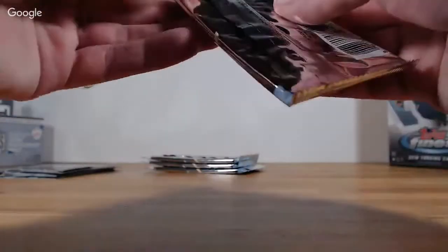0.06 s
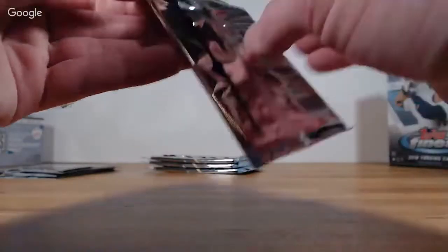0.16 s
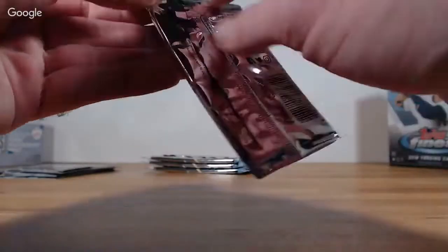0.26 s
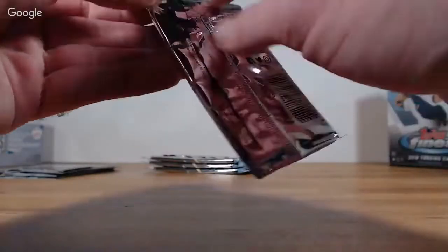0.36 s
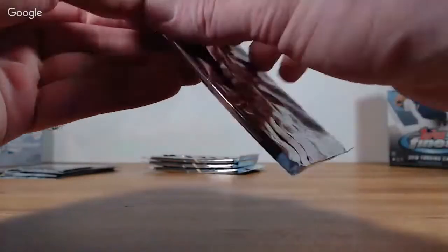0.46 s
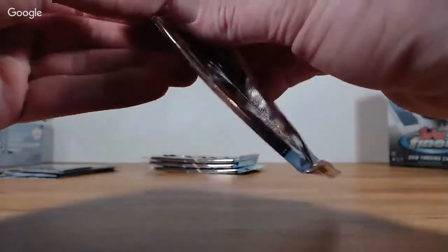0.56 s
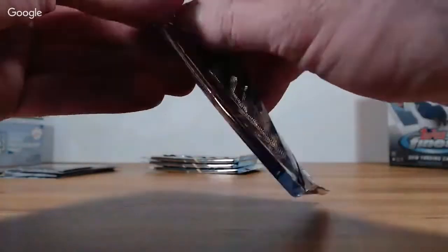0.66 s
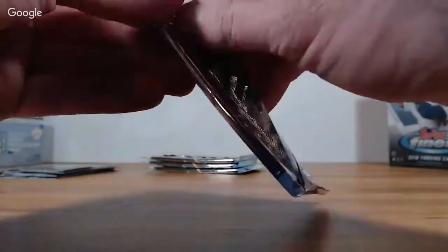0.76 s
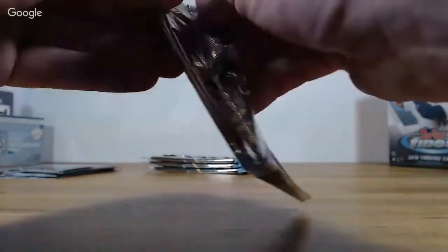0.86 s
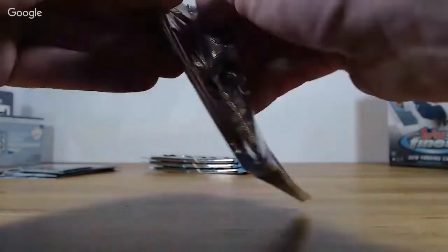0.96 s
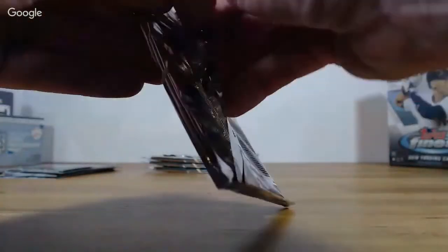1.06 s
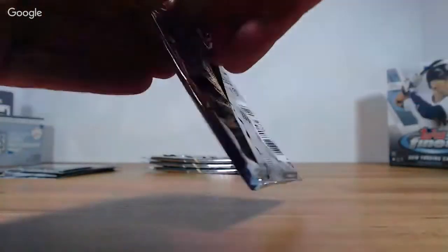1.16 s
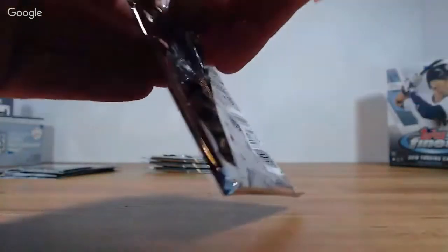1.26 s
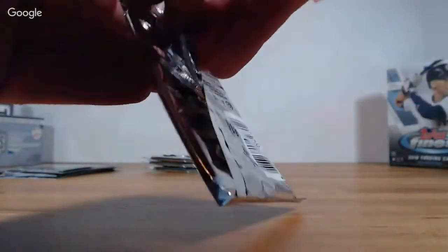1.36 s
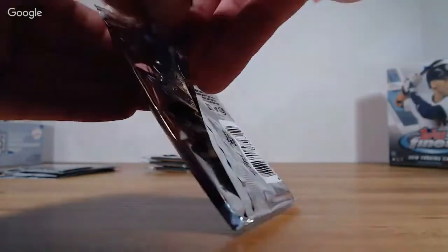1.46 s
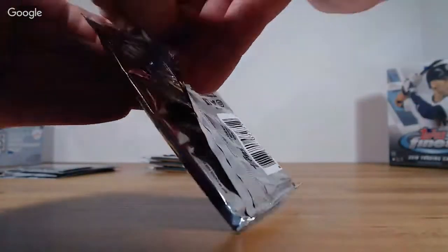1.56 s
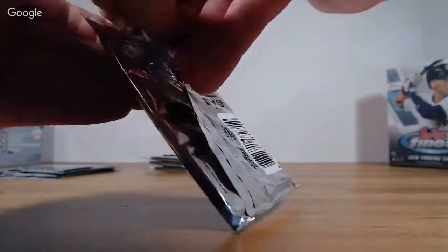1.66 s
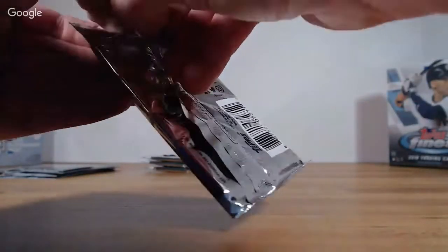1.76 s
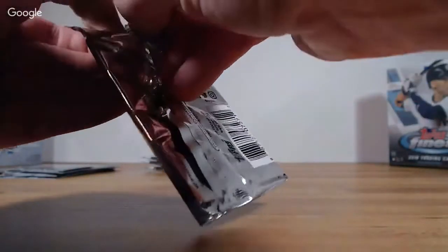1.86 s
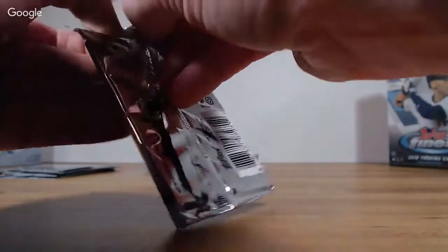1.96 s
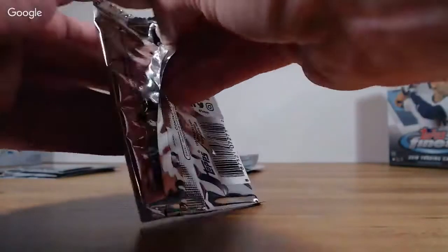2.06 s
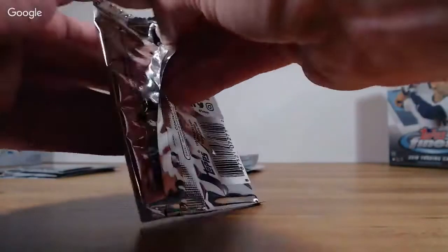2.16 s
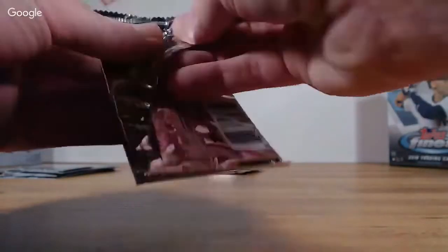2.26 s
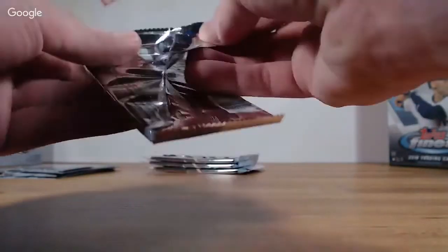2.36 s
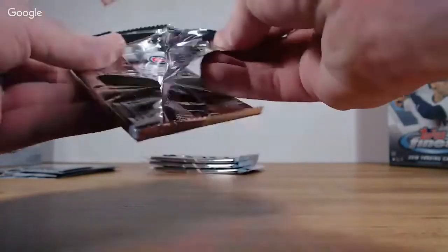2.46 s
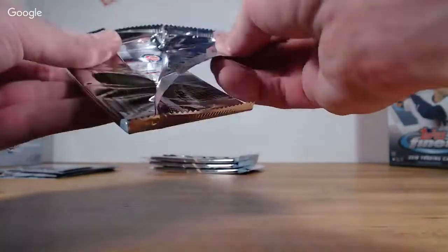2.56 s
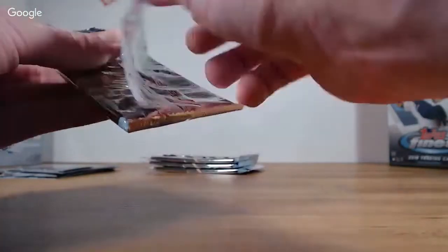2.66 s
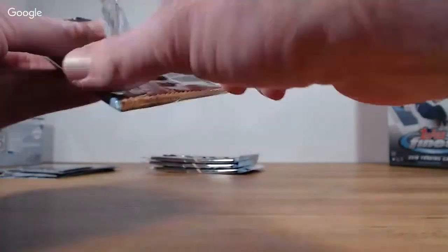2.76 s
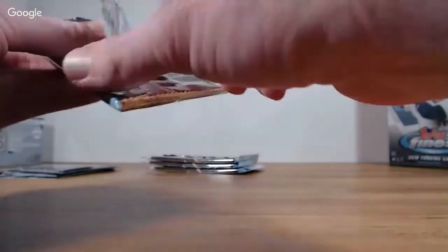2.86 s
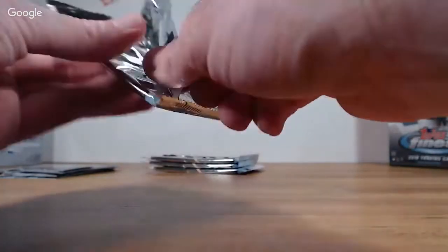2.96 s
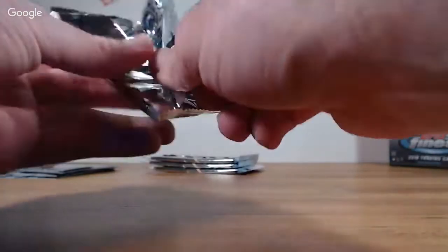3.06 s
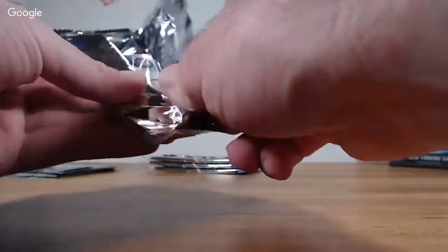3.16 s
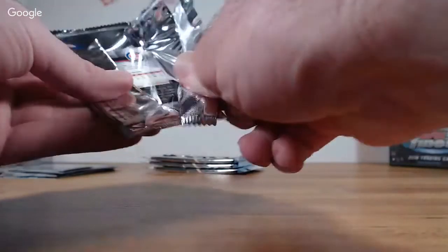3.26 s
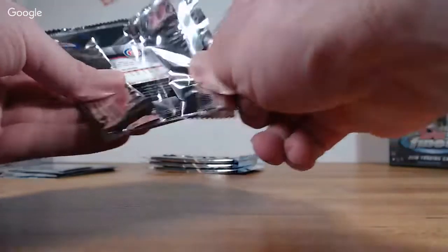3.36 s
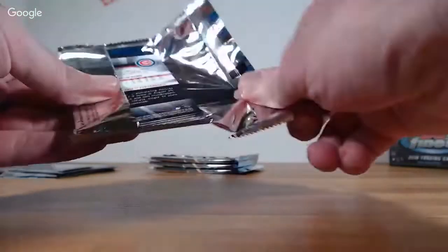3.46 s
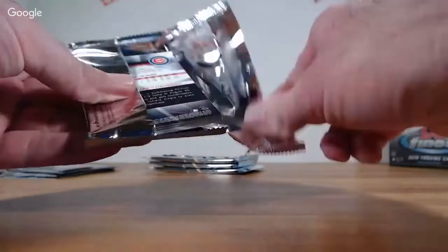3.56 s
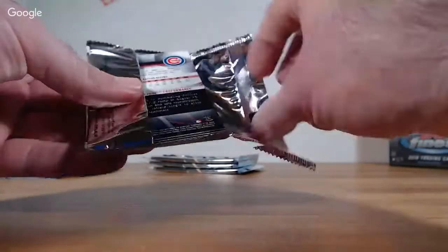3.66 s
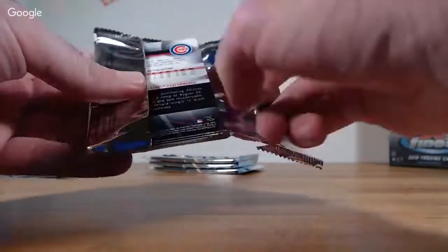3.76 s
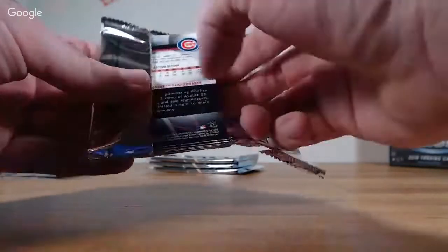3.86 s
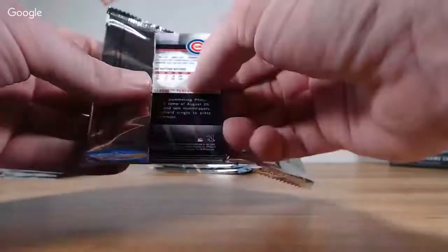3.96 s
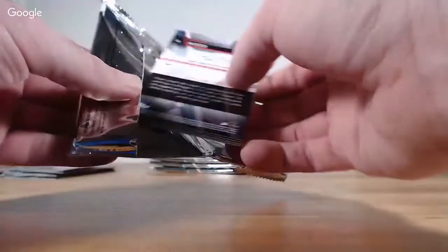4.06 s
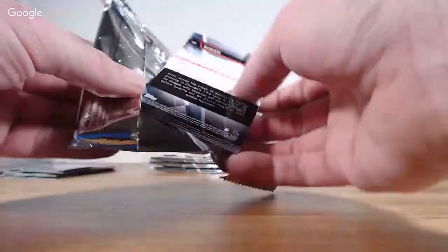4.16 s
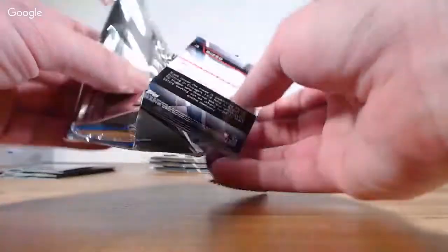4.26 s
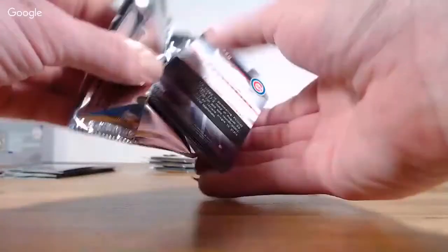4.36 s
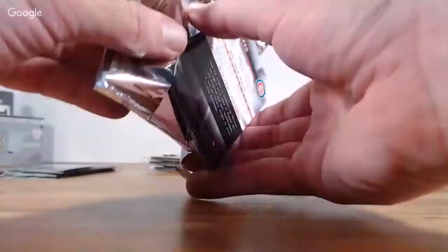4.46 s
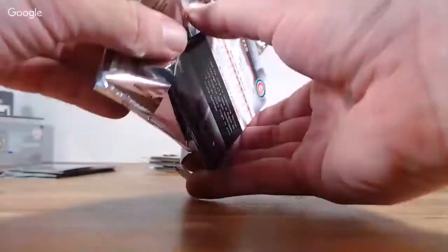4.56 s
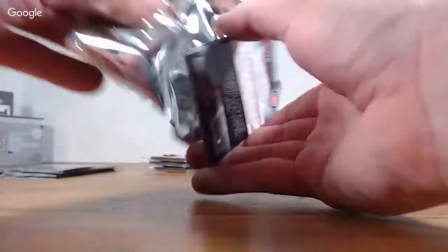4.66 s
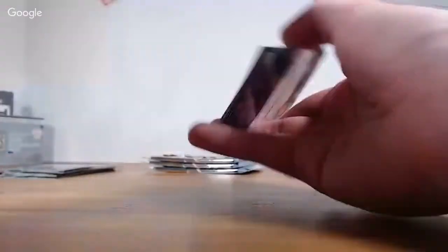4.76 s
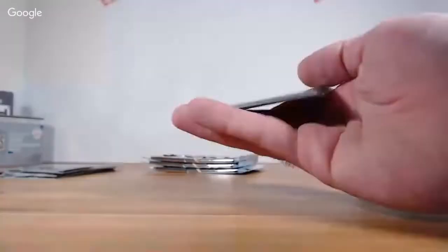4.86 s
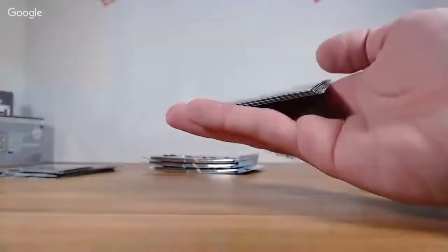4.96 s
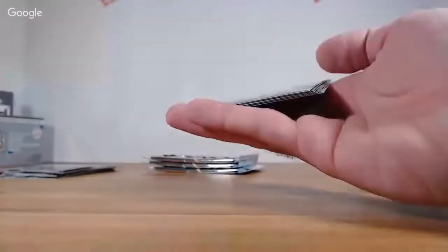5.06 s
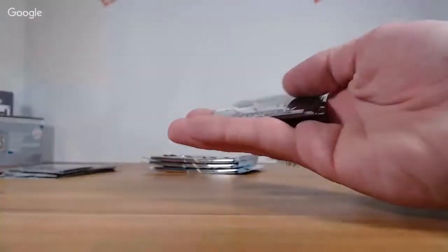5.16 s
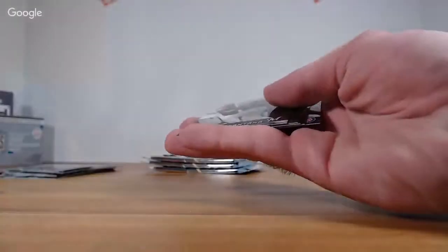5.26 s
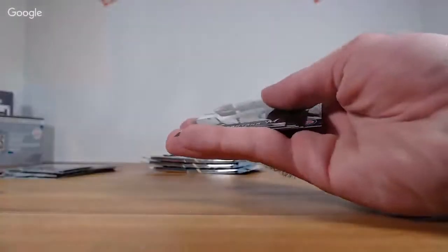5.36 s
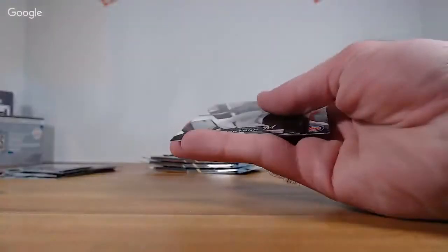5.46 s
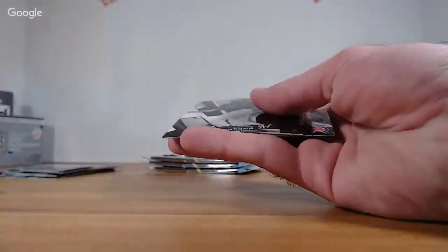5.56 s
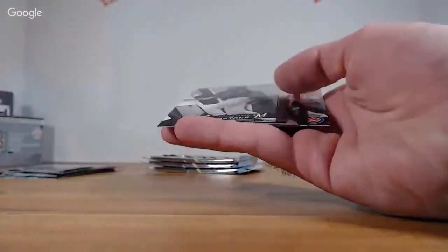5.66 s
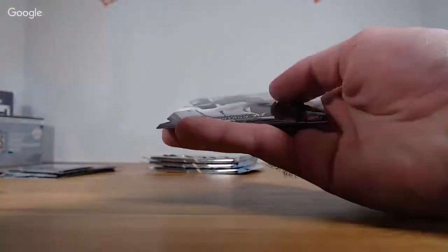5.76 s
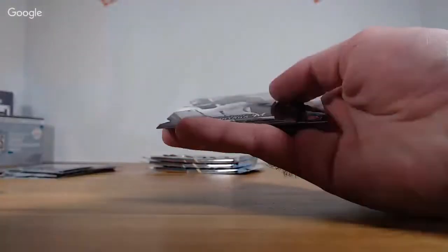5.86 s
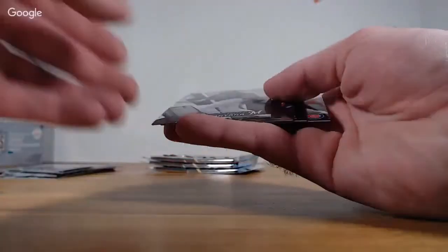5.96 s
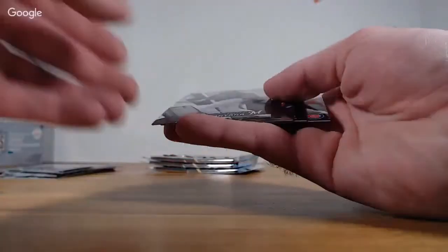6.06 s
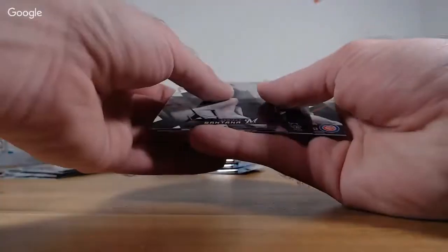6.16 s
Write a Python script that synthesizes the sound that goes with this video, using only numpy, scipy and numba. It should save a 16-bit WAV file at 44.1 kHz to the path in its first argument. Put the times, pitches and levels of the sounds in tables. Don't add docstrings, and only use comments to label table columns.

```python
import sys
import numpy as np
from scipy import signal
from scipy.fft import rfft, irfft, next_fast_len
from scipy.io import wavfile
from scipy.ndimage import uniform_filter1d
from numba import njit

SR = 44100
rng = np.random.default_rng(int(sys.argv[2]) if len(sys.argv) > 2 else 0)


def voltage_ratio(decibels):
    exponent = np.asarray(decibels, float) / 20
    return 10 ** exponent


def put_to_file(sound):
    columns = np.atleast_2d(sound).T
    safe = np.clip(columns, -1, 1)
    whole_steps = np.round(safe * 32767)
    wavfile.write(sys.argv[1], SR, whole_steps.astype(np.int16))


N = 273861
TIME_S = np.arange(N) / SR


def level(x, db):
    return x * voltage_ratio(db) / np.sqrt(np.mean(x ** 2))


def colour(x, points):
    hz, db = np.transpose(points)
    size = next_fast_len(len(x) + 8192)
    f = np.maximum(np.arange(size // 2 + 1) * SR / size, 1)
    gain = voltage_ratio(np.interp(np.log(f), np.log(hz), db))
    return irfft(rfft(x, size) * gain, size)[:len(x)]


def walk(rate):
    hold = int(SR / rate)
    steps = np.repeat(rng.standard_normal(N // hold + 1), hold)
    return uniform_filter1d(uniform_filter1d(steps, hold), hold)[:N]


@njit
def ring(s, hz, t60, size):
    out = np.zeros(N)
    for k in range(len(s)):
        turn = np.exp(2j * np.pi * hz[k] / SR - np.log(1000) / (t60[k] * SR))
        z = size[k] + 0j
        start = max(int(s[k] * SR), 0)
        for j in range(start, min(start + int(t60[k] * SR), N)):
            out[j] += z.imag
            z *= turn
    return out


GRIP_S, PATCHY_DB = .06, 5.5


def buckle(s, db, family, grip, count, spread_s, scatter_db):
    lo_hz, hi_hz, t60 = family
    u = rng.random((len(s), count, 4))
    lag = np.log(u[..., 0] / (1 - u[..., 0])) * spread_s
    place = (np.arange(count) + u[..., 1]) / count
    hz = lo_hz * (hi_hz / lo_hz) ** place
    grip_row = (s / GRIP_S).astype(int)[:, None] % len(grip)
    free_db = PATCHY_DB * grip[grip_row, (place * grip.shape[1]).astype(int)]
    share = voltage_ratio(free_db - scatter_db * (u[..., 2] + np.abs(lag) / spread_s))
    size = voltage_ratio(db)[:, None] * share / np.sqrt(np.sum(share ** 2, axis=1, keepdims=True))
    decay_s = t60 * (0.4 + 0.79 * u[..., 3])
    return ring((s[:, None] + lag).ravel(), hz.ravel(), decay_s.ravel(), size.ravel())


TURN_BUCKLES = [(0.0091, -13, -16, -4.5), (0.023, -20, -10, -18), (0.091, -24.5, -32, -1),
                (0.1446, -22.5, -33, -6.5), (0.1965, -34, -17, 4), (0.2285, -30.5, -6, -1.5),
                (0.2758, -26, -20, -1.5), (0.296, -24, -17, -15), (0.342, -30, -27, 1.5),
                (0.3601, -16.5, -41, 3), (.378, -18.5, -12, -3.5), (.4085, -24.5, -20, -6.5),
                (0.3858, -15.5, -9.5, 4.5), (0.3932, -19, -13, 4.5), (0.4593, -13.5, -21.5, -10),
                (0.4715, -26, 5.5, 3), (0.488, -20.5, -3.5, -3.5), (0.556, -19.5, -8, -6.5),
                (0.591, -21.5, -10, -3.5), (0.598, -14.5, -12.5, 4), (0.626, -29.5, -23, 8),
                (0.6915, -19, -20, 1), (0.7209, -19.5, -8, 0), (0.7367, -23.5, -15.5, 3.5),
                (0.758, -23, -6.5, 2), (0.7847, -21.5, -23, -0.5), (0.794, -18, -28.5, -1.5),
                (0.8029, -21.5, -18, 6), (0.834, -12, -28.5, 3), (0.842, -14, -23, 6.5),
                (0.853, -12, -33.5, -3), (0.8765, -22, -19, 4)]
SEAM_BUCKLES = [(0.983, -31, -22, -17.5), (1.0522, -12, -9.5, -9), (1.0615, -13, -10, 4.5),
                (1.112, -25.5, -22, 1), (1.179, -29, -30, 2.5), (1.2316, -30.5, -29.5, 7.5),
                (1.237, -23.5, -26, -3.5), (1.277, -29, -17, 7.5), (1.2984, -12, -31, -2),
                (1.3182, -31, -21, 5), (1.3642, -20, -30, -7), (1.3699, -11.5, -36, -0.5),
                (1.378, -34, -23, 1), (1.497, -12, -20, -3), (1.5948, -30.5, -25, 5.5),
                (1.6288, -21.5, -15, -2.5), (1.694, -28.5, -26.5, -6), (1.7056, -29.5, -31, 1),
                (1.729, -32, -34, 3.5), (1.756, -42.5, -27, 14.5), (1.8107, -14, -47, -8),
                (1.8232, -25.5, -23, 8), (1.8693, -25, -34, 11), (1.9105, -28, -11, 6.5),
                (2.0188, -31, -0.5, -3), (2.0308, -21, -12, -8.5), (2.0543, -25, 1, 4.5),
                (2.0627, -31, -12, 4.5)]
TEAR_BUCKLES = [(2.1106, -35, -25, 2), (2.1153, -26.5, -20, -9), (2.122, -27, -30, -0.5),
                (2.152, -24, -3, -4.5), (2.1755, -19, -29, 1.5), (2.2025, -16, -13, -6.5),
                (2.2148, -19, -9.5, -12.5), (2.241, -21, -8, 3), (2.304, -17, -16.5, -7),
                (2.3196, -17, -6, -0.5), (2.3392, -11, -17, -3), (2.3703, -20.5, 3, -4),
                (2.3921, -11, -15, -2), (2.4155, -13, -18.5, -1.5), (2.4243, -19, -2.5, 5.5),
                (2.4517, -19, -12, 5), (2.4758, -11.5, -2, -2), (2.488, -16, -12.5, -0.5),
                (2.496, -22.5, -0.5, 10.5), (2.5359, -26.5, 9.5, 12), (2.6156, -14, -2, 0.5),
                (2.628, -18.5, -21, -4), (2.6426, -24, -20, -1), (2.6802, -14.5, -7, -4.5),
                (2.7537, -23.5, -30, -5), (2.7734, -39, -26, -11), (2.8925, -18.5, -2.5, 5),
                (2.932, -17, -11, -4.5), (2.952, -20.5, -12.5, -5.5), (2.9716, -22, -27, -11)]
RIP_BUCKLES = [(3.0251, -20, -31, -5.5), (3.0859, -17, -25, -1.5), (3.101, -19, -13, 1),
               (3.136, -26, -28, 3), (3.169, -21, -22, -5), (3.1796, -19.5, -13, -4), (3.208, -17, -11, -5),
               (3.2405, -9.5, -15.5, -5.5), (3.2485, -15.5, -9.5, 4), (3.252, -8, -23.5, -3),
               (3.262, -15.5, -20, -12), (3.274, -10.5, -16, -2.5), (3.2865, -18, -4.5, 7.5),
               (3.299, -19.5, -9.5, 4.5), (3.312, -10, -21, 1), (3.3335, -10.5, -14, 1.5),
               (3.3654, -13.5, -8.5, 3), (3.3886, -13.5, -2.5, 4), (3.4022, -18, -7.5, 3.5),
               (3.4095, -13, -9.5, 6.5), (3.4809, -15.5, -5, -1.5), (3.4917, -23.5, 3.5, 6.5),
               (3.5583, -20, -3.5, 2.5), (3.592, -17.5, 4, -0.5), (3.5991, -22, -7, -6.5),
               (3.643, -29.5, 5.5, 7.5)]
DROP_BUCKLES = [(3.826, -24, -15.5, -1.5), (3.836, -31, -14.5, -12), (3.9107, -25, -13.5, -9),
                (3.939, -23.5, -4, -1.5), (3.965, -20.5, -18.5, -4.5), (3.9993, -26, 1, -6),
                (4.231, -31, -26, 6.5), (4.3178, -31.5, -10, 7), (4.3676, -25.5, -26, 6.5),
                (4.4618, -15.5, -4, -2.5), (4.4722, -29, -12, 9), (4.5069, -22.5, -38, 3.5),
                (4.5158, -23, -24, -8), (4.5771, -31, -6, -2.5), (4.6763, -34.5, -17.5, 3),
                (4.692, -20.5, -11.5, 10.5), (4.724, -28, -27.5, 5.5), (4.9197, -17, -11, -4.5),
                (5.0793, -55.5, 13, -11), (5.2338, -30, -6, -3), (5.288, -29, -9, -19),
                (5.4074, -51, -17.5, 12.5), (5.5875, -31.5, -9.5, 6)]
# (time [s], peak [dB])
SMALL_TICKS = [(0.2114, -32.5), (0.2364, -34.5), (0.5276, -24), (0.5601, -21), (0.5736, -5.5), (0.677, -18),
               (0.9705, -26), (1.146, -33), (1.5097, -22), (1.5696, -24), (1.6248, -27), (1.6594, -23.5),
               (1.741, -29), (1.8339, -16), (1.931, -30.5), (1.9408, -26), (1.9484, -28), (1.96, -27),
               (2.1954, -15), (2.69, -22), (2.818, -24.5), (3.043, -27), (3.532, -21), (3.6267, -16),
               (4.1654, -44), (4.1754, -53.5), (4.3053, -22), (4.346, -20), (4.4248, -25.5), (4.792, -39),
               (4.805, -35), (4.98, -33), (4.987, -39.5), (5.222, -35),
               (1.5995, -21),
    (1.6748, -28),
    (1.8, -25),
    (2.4695, -14),
]
TICK_DB, TICK_BODY_DB, TICK_EDGE_DB = -12.5, -12.5, 7.5


def big_buckles():
    ticks = []
    for s, db in SMALL_TICKS:
        ticks.append((s, min(db, -15) + TICK_DB, TICK_BODY_DB, TICK_EDGE_DB))
    return TURN_BUCKLES + SEAM_BUCKLES + TEAR_BUCKLES + RIP_BUCKLES + DROP_BUCKLES + ticks


# (lowest mode [Hz], highest mode [Hz], ring t60 [s])
BODY, FACET, EDGE = (800, 2106, 0.012), (2570, 7740, 0.0047), (8090, 15930, 0.0044)
PACK = (285, 800, 0.028)
# (frequency [Hz], gain [dB])
LITTLE_BASS = [(200, -30), (600, -18.5), (1000, -8), (2000, 1)]


def snaps(grips):
    s, db, body_db, edge_db = np.transpose(big_buckles())
    levels = (db - 2, db + edge_db + 3, db + body_db + 0.5)
    out = 0
    for family, family_db, grip in zip((FACET, EDGE, BODY), levels, grips):
        crack = buckle(s - .0002, family_db + 2, family, .6 * grip, count=8, spread_s=.0001, scatter_db=3)
        cascade = buckle(s + .0011, family_db, family, grip, count=12, spread_s=.0017, scatter_db=1)
        out = out + crack + cascade
    return colour(out, LITTLE_BASS)


# (time [s], peak [dB], pitch [Hz])
TURN_MODES = [(0.0899, -13.5, 4840), (0.1433, -19, 3580), (0.2763, -20, 4190), (0.3411, -23, 6280),
              (0.3593, -7, 6580), (0.386, -6.5, 6870), (0.4592, -6.5, 3850), (0.4896, -16.5, 4650),
              (0.596, -6, 7230), (0.6902, -15.5, 4130), (0.7363, -17.5, 4090), (0.7841, -12, 6670),
              (0.7934, -7.5, 6170), (0.835, -3, 6900), (0.852, -5, 5770), (0.8999, -16.5, 3370),
              (0.982, -22, 4680), (1.051, -6, 5270), (1.06, -11.5, 3900), (1.112, -17.5, 5780),
              (1.1784, -22.5, 3800), (1.2241, -27, 3260), (1.237, -23.5, 5680), (1.275, -23, 5880),
              (1.297, -11, 6760), (1.318, -24.5, 3880), (1.3685, -10.5, 4080), (1.496, -14.5, 5250),
              (1.6283, -21.5, 3190), (1.81, -10.5, 4720), (1.868, -7, 7190), (1.909, -21, 4900),
              (2.0306, -19, 5370), (2.1138, -15, 6900)]
# (time [s], peak [dB], pitch [Hz])
TEAR_MODES = [(2.1517, -22.5, 2980), (2.1744, -18, 3700), (2.2004, -17, 4260), (2.24, -16, 7320),
              (2.265, -23, 2960), (2.3027, -9.5, 4170), (2.3383, -8, 3820), (2.3676, -19, 2500),
              (2.3782, -14, 7100), (2.391, -7.5, 4320), (2.4132, -7, 3810), (2.4505, -15, 6280),
              (2.476, -6, 5020), (2.6142, -11, 3180), (2.6558, -18, 3580), (2.6785, -11.5, 2490),
              (2.753, -18, 4850), (2.7723, -22, 3060), (2.892, -13, 3520), (2.9295, -15.5, 3440),
              (2.9499, -13.5, 3480), (2.9699, -15, 4300), (3.0237, -20, 6300), (3.0865, -12.5, 5350),
              (3.1345, -16, 5430), (3.1684, -17.5, 3120), (3.1779, -11, 4740), (3.2078, -15, 4980),
              (3.2395, -6.5, 5650), (3.2612, -5, 5550), (3.2722, -6, 6270), (3.3101, -6, 5030),
              (3.331, -6, 5480), (3.364, -13, 6500), (3.3884, -12.5, 2860), (3.4084, -7.5, 5270),
              (3.4363, -18.5, 2552), (3.4792, -13.5, 2434)]
# (time [s], peak [dB], pitch [Hz])
DROP_MODES = [(3.5567, -18, 2400), (3.5928, -16.5, 3260), (3.734, -34, 2300), (3.7523, -25, 7500),
              (3.827, -22, 4060), (3.9078, -16, 5530), (3.938, -24, 4070), (3.964, -26, 4000),
              (3.9967, -22.5, 5500), (4.02, -23, 5970), (4.231, -17, 5170), (4.319, -17, 6190),
              (4.3579, -18, 4900), (4.367, -8.5, 6500), (4.4617, -18.5, 3260), (4.575, -31, 3050),
              (4.6158, -41, 2750), (4.691, -9, 5660), (4.7226, -18.5, 3810), (4.9169, -17, 3160),
              (5.079, -49, 3080), (5.2313, -23, 4400), (5.404, -45.5, 4170)]
# (time [s], peak [dB], pitch [Hz])
PANEL_MODES = [(0.2955, -28.5, 1500), (0.385, -23.5, 1880), (0.459, -23, 1900), (0.693, -24.5, 1430),
               (0.7567, -25, 2350), (0.8036, -23, 1295), (1.052, -26.5, 2364), (1.3688, -25, 2230),
               (1.4965, -19.5, 2300), (1.8107, -34, 2040), (1.908, -36, 2130), (2.0183, -33, 2120),
               (2.152, -22, 1391), (2.369, -21, 2350), (2.476, -4, 1480), (2.616, -28, 1580),
               (3.088, -30, 2140), (3.1687, -32, 2310), (3.237, -14.5, 1480), (3.286, -13.5, 1510),
               (3.4102, -15.5, 962), (3.5593, -18, 1670), (3.5908, -21.5, 1680), (3.8244, -25, 1650),
               (3.9073, -24, 1650), (4.46, -26, 1560), (4.919, -28, 1480), (5.0784, -37, 2060),
               (0.5734, -22, 3250),
    (1.0864, -21, 2370),
    (1.1907, -29.5, 3850),
    (1.3954, -25, 3450),
    (1.8274, -28, 3740),
    (1.9475, -34, 2080),
    (2.0448, -19, 3600),
    (2.4904, -12, 1250),
    (2.5524, -20, 1310),
    (3.1184, -30, 3470),
]
# (frequency [Hz], gain [dB])
MIC_RESPONSE = [(30, -22.5), (55, -15), (1500, -5), (2600, 0), (6500, 5.5), (7700, 1), (8300, 3.5),
                (10500, 4.5), (13500, -3.5), (15400, -14.5), (16100, -40)]
RING_DB, RING_CYCLES, RING_SPREAD, RING_LATE_S = -10, 35.7, 0.065, .014


def rings():
    rows = TURN_MODES + TEAR_MODES + DROP_MODES + PANEL_MODES
    s, db, hz = np.transpose(rows)[..., None]
    u = rng.random((len(s), 8, 3))
    late = u[..., 0] ** 3 * (np.arange(8) > 1)
    hz = hz * (1 + RING_SPREAD * (u[..., 1] - .5))
    mic_hz, mic_db = np.transpose(MIC_RESPONSE)
    heard_db = np.interp(np.log(hz), np.log(mic_hz), mic_db)
    size = np.sign(u[..., 2] - .5) * voltage_ratio(db + RING_DB - 20 * late - 1.1 * heard_db)
    at = s + .0006 + RING_LATE_S * late
    t60 = np.minimum(RING_CYCLES / hz, .015)
    return colour(ring(at.ravel(), hz.ravel(), t60.ravel(), size.ravel()), LITTLE_BASS)


# (peak time [s], crackle level [dB], time to settle 20 dB [s], bulk of foil moved [dB])
HAND_SQUEEZES = [(.005, -31, 0.23, -2.5), (.285, -46, -1.5, -4), (0.386, -34, 0.9, -2),
                 (1.059, -33, 0.48, 0), (1.305, -33.5, 0.12, -6), (1.372, -33, 0.35, -13),
                 (1.505, -38, 0.6, -4), (1.82, -36.5, 0.8, -10), (2.19, -28, 1.26, -5.5),
                 (2.62, -26, 0.2, 5.5), (2.9, -39.5, 0.86, 8), (3.09, -33, 0.23, 0), (3.182, -35, 0.63, -6),
                 (3.244, -17.5, 0.2846, 8.5), (3.753, -31, 0, -1), (3.831, -43, -0.3, -5),
                 (4.167, -57, 0.7, -3), (4.25, -40.5, 0.29, -16), (4.468, -40, 0.47, 7),
                 (4.726, -46, 0.22, -26), (4.93, -46, 0.18, -15), (5.232, -40, 0.0361, 10.5),
                 (5.412, -55.5, 0.18, -5.5)]
# (peak time [s], crackle level [dB], time to rise 20 dB [s], time to fall 20 dB [s], bulk of foil moved [dB])
HAND_PULLS = [
    (.6, -36, 0.7, 1.36, -2.5),
    (.837, -23, 0.24, 0.1544, -2),
    (2.065, -32.5, 0.11, 0.04, 4),
    (2.34, -22.5, 0.1745, 0.42, 4.5),
    (2.486, -22, 0.2753, 0.1, 5.5),
    (3.334, -21, 0.2, 0.3381, 13.5),
    (3.596, -33.5, 0.83, 0, 5.5),
    (4.03, -36, 0.51, 0.05, 3.5),
    (4.361, -38.5, 0.3, 0.4753, 8),
]
SQUEEZE_RISE_S = 0.013
LET_GO = 0.68
BULK_FOLLOW = (0.06, 0.07, 0.86, 1.17)


def handling():
    squeezes = [(s, db, SQUEEZE_RISE_S, fall, bulk) for s, db, fall, bulk in HAND_SQUEEZES]
    s, db, rise, fall, bulk = np.transpose(squeezes + list(HAND_PULLS))[..., None]
    late = TIME_S - s
    away = np.abs(late / np.where(late < 0, rise, fall))
    db = db - 20 * away * (1 + LET_GO * away ** 2)
    return [np.max(db + follow * bulk, axis=0) for follow in BULK_FOLLOW]


def aftershock(db):
    below_db, fade_db_s = -25, 350
    kicks = np.zeros(N)
    at = (np.transpose(big_buckles())[0] * SR).astype(int)
    np.add.at(kicks, at, voltage_ratio(db + below_db) ** 2)
    power = signal.lfilter([1], [1, -voltage_ratio(-2 * fade_db_s / SR)], kicks + 1e-18)
    return np.sqrt(power)


SHARE_DB = (-8, -9, -13.5, -22.5)
STUTTER_DB = 4
RUMBLE_DB = -40.5


def crackle(grips, per_s=2300, heavy_db=2.5):
    u = rng.random((17000, 2))
    s = np.cumsum(-np.log(u[:, 0])) / per_s
    db = np.minimum(-heavy_db * np.log(u[:, 1]), 12)
    _, snap_db, body_db, edge_db = np.transpose(big_buckles())
    after = (snap_db, snap_db + edge_db, snap_db + body_db, snap_db + 2 * body_db - 21)
    stutter = voltage_ratio(STUTTER_DB * walk(70))
    families = (FACET, EDGE, BODY, PACK)
    out = 0
    for family, grip, gain_db, share_db, after_db in zip(families, grips, handling(), SHARE_DB, after):
        grains = buckle(s, db, family, grip, count=3, spread_s=0.00026, scatter_db=0.5)
        grains = colour(grains, [(family[0] / 1.5, -24), (family[0], 0), (family[1], 0)])
        earlier_db = np.pad(gain_db, (500, 0), mode="edge")[:N]
        gain_db = np.minimum(gain_db, earlier_db)
        gain = np.hypot(stutter * voltage_ratio(gain_db + share_db), aftershock(after_db))
        out = out + gain * level(grains, 0)
    rumble = colour(rng.standard_normal(N), [(90, 0), (250, -29.5), (16000, -120)])
    return out + voltage_ratio(gain_db) * level(rumble, RUMBLE_DB)


# (start time [s], hold time [s], level [dB])
CARD_STROKES = [
    (5.573, 0.042, -35),
    (5.784, 0.032, -64.5),
]


def stroke_db():
    rise_s, fall_db_s, rest_db, rest_fall_db_s = 0.017, 241.5, -77, 59.5
    s, hold, db = np.transpose(CARD_STROKES)[..., None]
    late = TIME_S - s - rise_s
    db = db - np.maximum(-60 * late / rise_s, 0)
    db = db - fall_db_s * np.maximum(late - hold, 0)
    rest = rest_db - rest_fall_db_s * np.abs(TIME_S - CARD_STROKES[-1][0])
    return np.maximum(db.max(axis=0), rest)


# (frequency [Hz], density [dB per Hz])
CARD_RUB = [(59, -43), (100, -5), (721, -10.5), (1550, -6.5), (3540, -15), (4380, -9), (10200, -21),
            (16000, -18.5)]
# (frequency [Hz], width [Hz], gain [dB])
AIR_GAPS = [(4300, 870, 1.5), (6750, 230, 7), (9650, 1600, 11)]
REST_END_S = 6.036


def cards():
    rough = rng.standard_normal(N) * voltage_ratio(2 * walk(150))
    rub = level(colour(rough, CARD_RUB), 0)
    f = np.arange(N // 2 + 1) * SR / N
    gaps = sum(voltage_ratio(db) / (1 + (2 * (f - hz) / width) ** 2) for hz, width, db in AIR_GAPS)
    level_db = stroke_db()
    slow = np.clip((-50 - level_db) / 20, 0, 1)
    rub = (1 - 0.42 * slow) * rub
    rub = rub + (0.45 + slow) * irfft(rfft(rub / (1 - 0.42 * slow)) * gaps, N)
    started = TIME_S > CARD_STROKES[0][0]
    ending = np.clip((REST_END_S - TIME_S) / 0.16, 0, 1)
    return rub * voltage_ratio(level_db) * started * ending


KNOCK_TIMES = [.386, .692, 1.052, 1.370, 1.436, 1.061, 2.052, 2.477, 2.682, 2.93, 3.17, 2.476, 3.57, 4.095,
               4.345, 4.691, 4.920, 5.079, 5.23, 5.41, 4.93]
# (pitch [Hz], t60 [s], level [dB])
KNOCK_MODES = [(1820, 0.051, -18), (1260, 0.025, -7), (378, 0.037, -27), (2230, 0.35, -30.5),
               (2120, 0.057, -28), (700, 0.043, -30), (239, 0.12, -37), (1180, 0.12, -11.5),
               (420, 0.087, -35), (270, 0.1, -31), (327, 0.22, -28.5), (1500, 0.0234, -4), (254, 0.39, -35),
               (1700, 0.089, -35.5), (2270, .07, -27), (152.4, 0.017, -27.5), (3190, 0.38, -30),
               (2040, 0.028, -44.5), (305, 0.15, -39), (4080, 0.41, -50), (1480, 0.21, -38)]


def knocks():
    columns = (KNOCK_TIMES, *np.transpose(KNOCK_MODES))
    s, hz, t60, db = (np.repeat(c, repeats=60) for c in columns)
    u = rng.random((len(s), 3))
    late = u[:, 0] ** 2 * .5
    tap_t60 = np.minimum(t60, 60 / hz)
    at = s + late * (t60 - .8 * tap_t60)
    size = np.sign(u[:, 2] - .5) * voltage_ratio(db - 14 - 60 * late)
    hz = hz * (1 + np.minimum(.04 + 70 / hz, .25) * (u[:, 1] - .5))
    small = hz > 800
    bumps = ring(at, hz, tap_t60, size * ~small)
    pops = ring(at, hz, tap_t60, size * small)
    return bumps + colour(pops, LITTLE_BASS)


def thump():
    start_s, pitch_hz, sag_hz_s, swell_s, thump_db = 1.647, 70, 150, .027, -40.5
    t = np.maximum(TIME_S - start_s, 0)
    swell = t / swell_s * np.exp(1 - t / swell_s)
    return voltage_ratio(thump_db) * swell * np.sin(2 * np.pi * (pitch_hz - sag_hz_s * t / 2) * t)


ROOM_T60_S, ROOM_DB = 0.087, -13.5


def room(x):
    t = np.arange(SR // 2) / SR
    tail = rng.standard_normal(len(t)) * voltage_ratio(-60 * t / ROOM_T60_S) * (t > .003)
    tail = colour(tail, [(200, 14.5), (6000, 3.5), (15000, -8.5)])
    tail = tail / np.sqrt(np.sum(tail ** 2))
    return voltage_ratio(ROOM_DB) * signal.fftconvolve(x, tail)[:N]


# (frequency [Hz], density [dB per Hz])
AIR_SPECTRUM = [(30, -10), (252, -8), (355, -12.5), (600, -14), (980, -26), (1280, -29), (11700, -67),
                (16000, -54.5)]
# (time [s], level [dB])
SUPPRESSION = [
    (0, 16.5),
    (5.95, 16.5),
    (6.08, 8.5),
    (6.21, 5),
]
AIR_DB = -71


def air():
    out = 0
    for hz in 40 * 2 ** np.arange(0, 9, .5):
        band = [(hz / 2, -40), (hz / 1.2, 0), (hz * 1.2, 0), (hz * 2, -40)]
        out = out + voltage_ratio(1.9 * walk(42)) * colour(rng.standard_normal(N), band)
    hush_db = np.interp(TIME_S, *np.transpose(SUPPRESSION))
    return level(colour(out, AIR_SPECTRUM), AIR_DB) * voltage_ratio(hush_db)


def hiss():
    spectrum = [(500, -15.5), (1200, 10), (5000, -9), (12000, 2)]
    return level(colour(rng.standard_normal(N), spectrum), -79)


def scene():
    grips = rng.standard_normal((4, 400, 7))
    near = snaps(grips) + rings() + crackle(grips) + cards() + knocks() + thump()
    return (near + room(near) + air() + hiss())[None]


def roll_off(x):
    return signal.sosfilt(signal.butter(12, 16630, fs=SR, output="sos"), x)


def record(dry):
    heard = colour(dry[0], MIC_RESPONSE)
    over = np.maximum(np.abs(heard) - .6, 0)
    held = heard - np.sign(heard) * (over - .3 * np.tanh(over / .3))
    mix = colour(held, [(16200, 0), (16800, -50.5)])[None]
    return roll_off(mix)


dry = scene()
out = record(dry)
put_to_file(out)
```